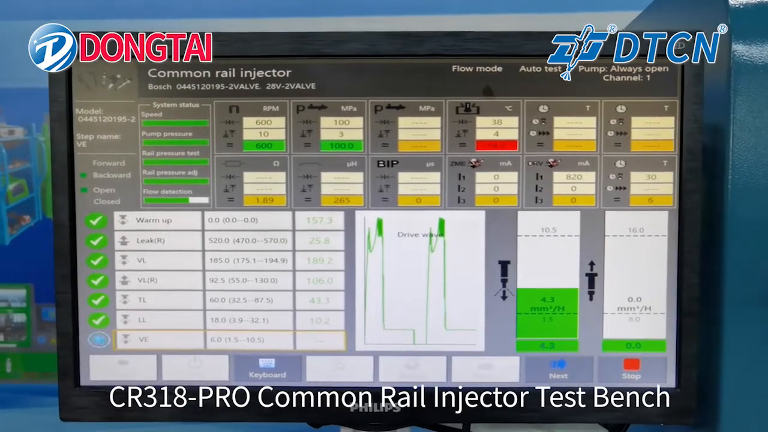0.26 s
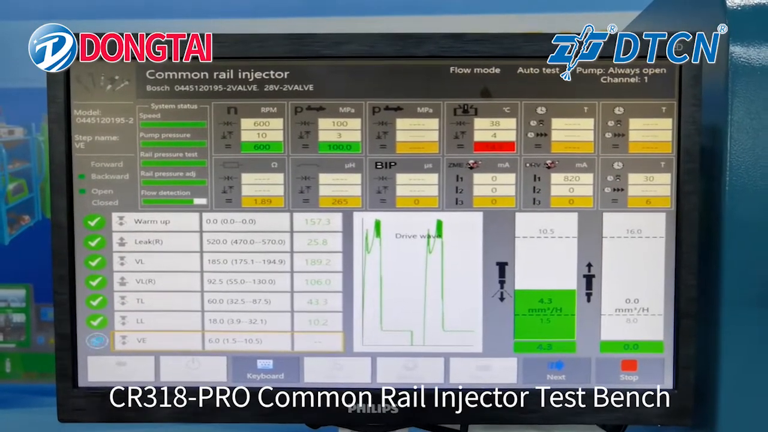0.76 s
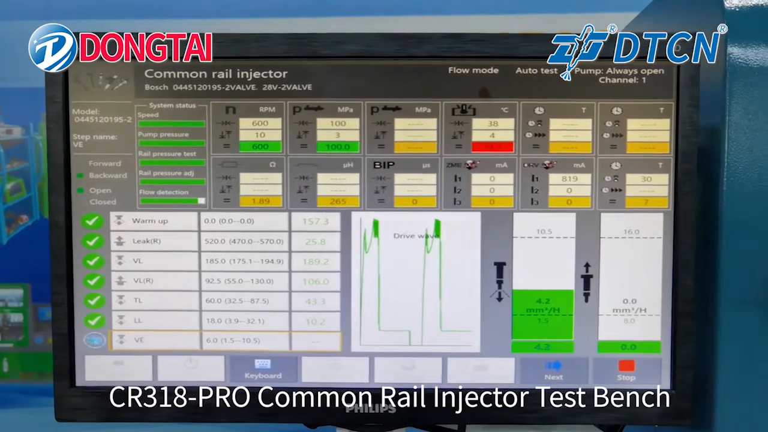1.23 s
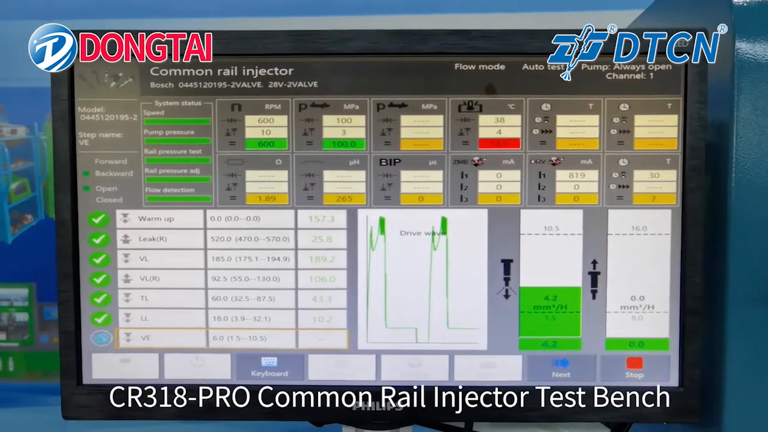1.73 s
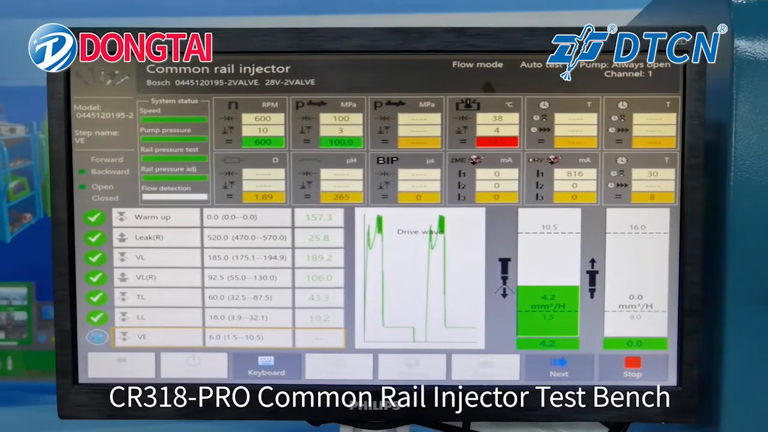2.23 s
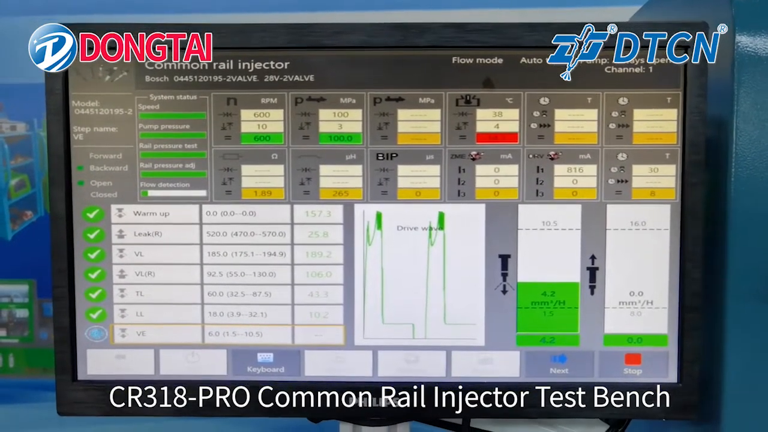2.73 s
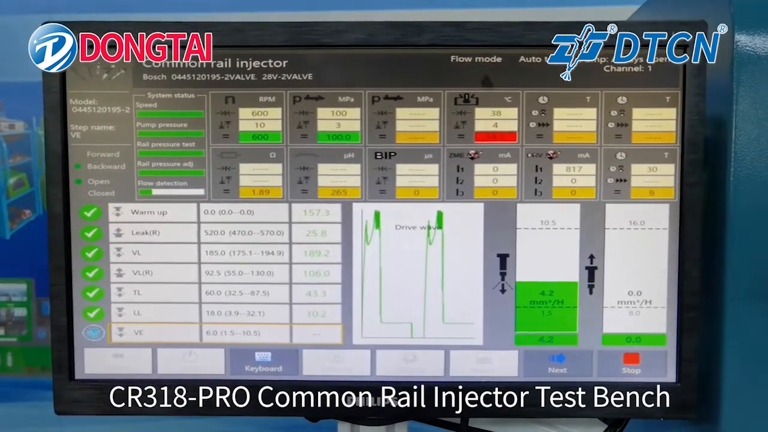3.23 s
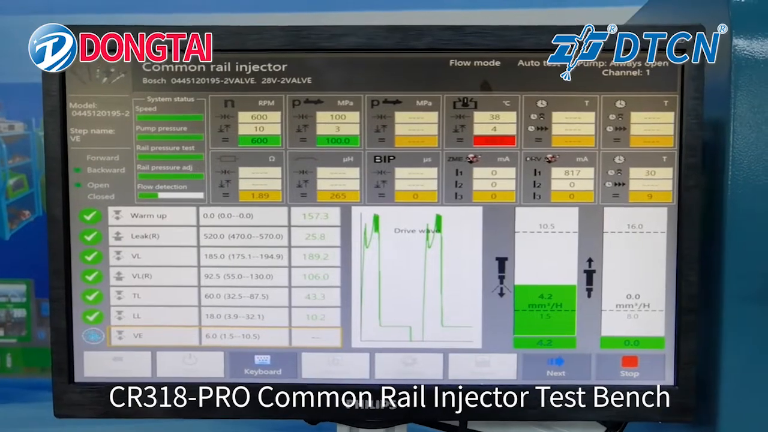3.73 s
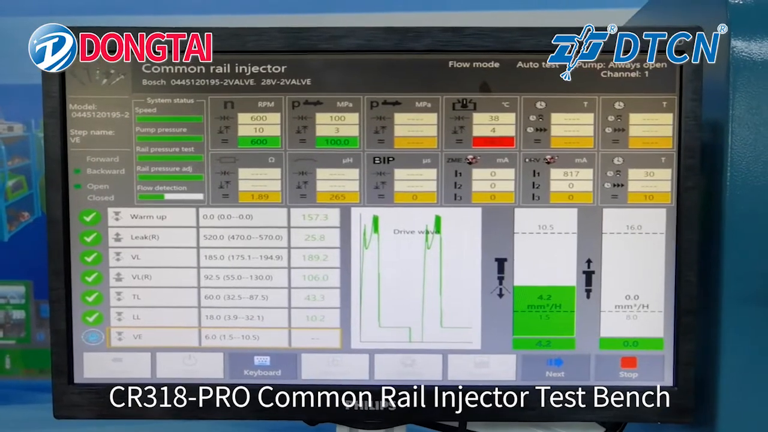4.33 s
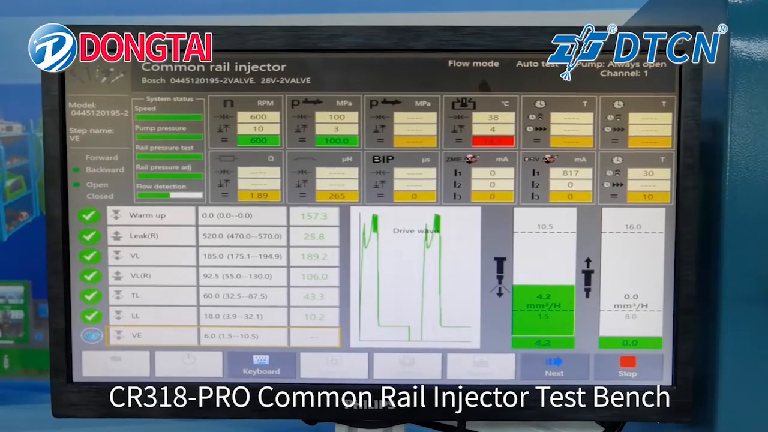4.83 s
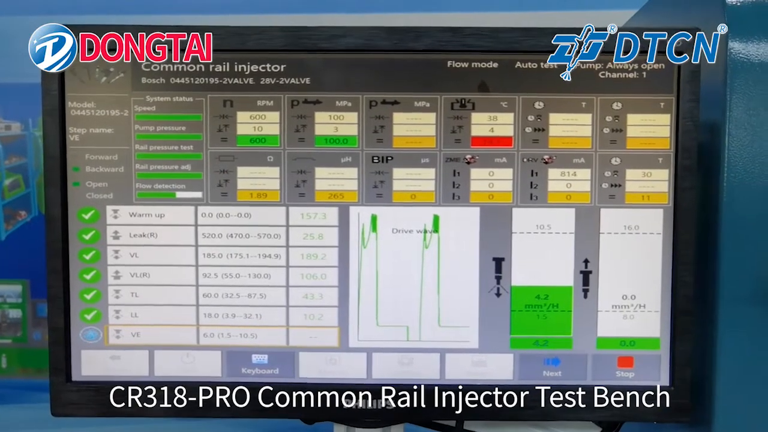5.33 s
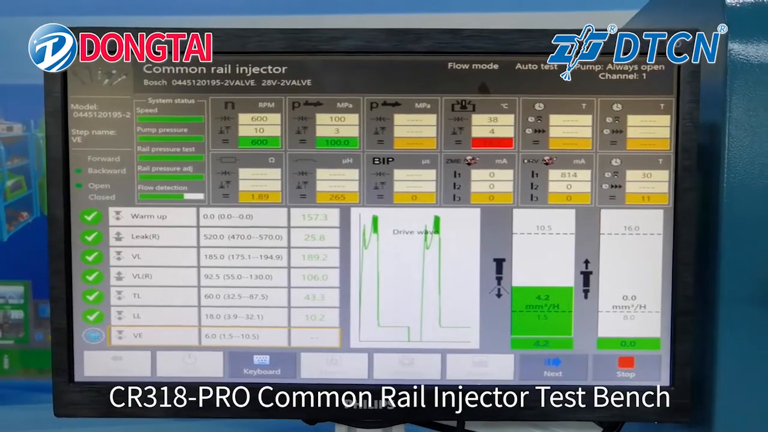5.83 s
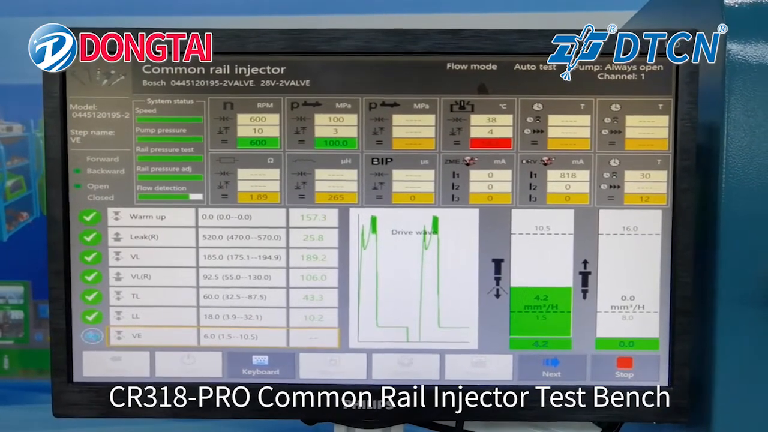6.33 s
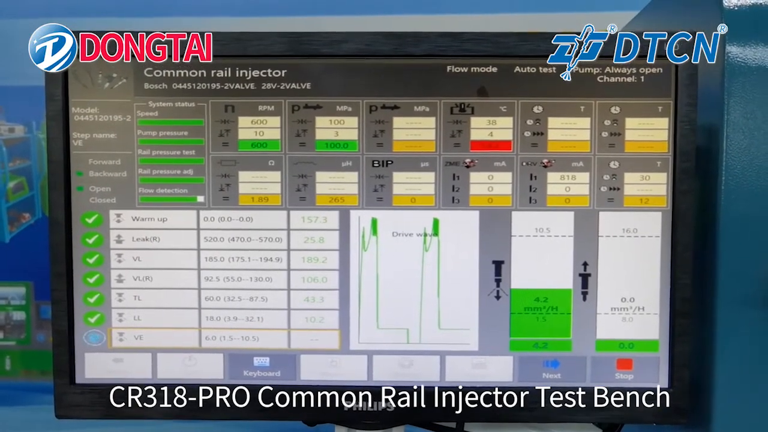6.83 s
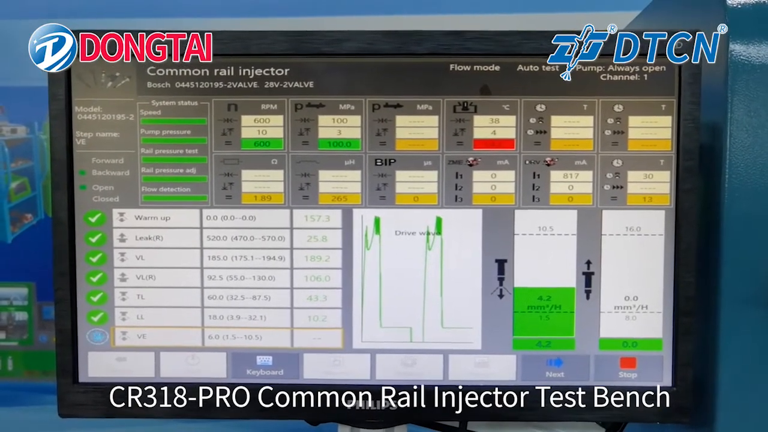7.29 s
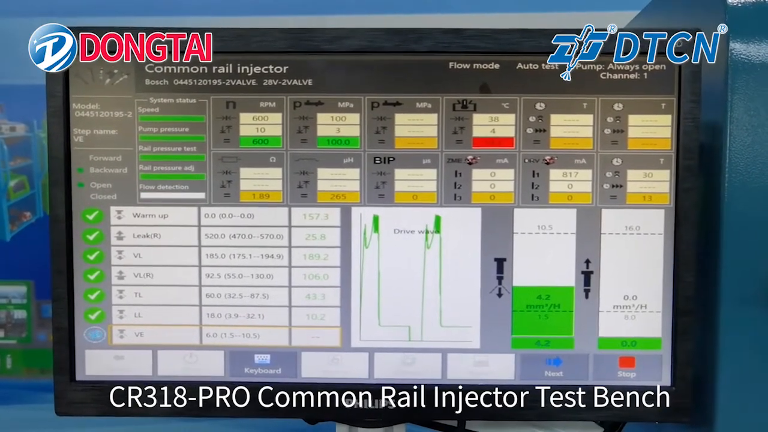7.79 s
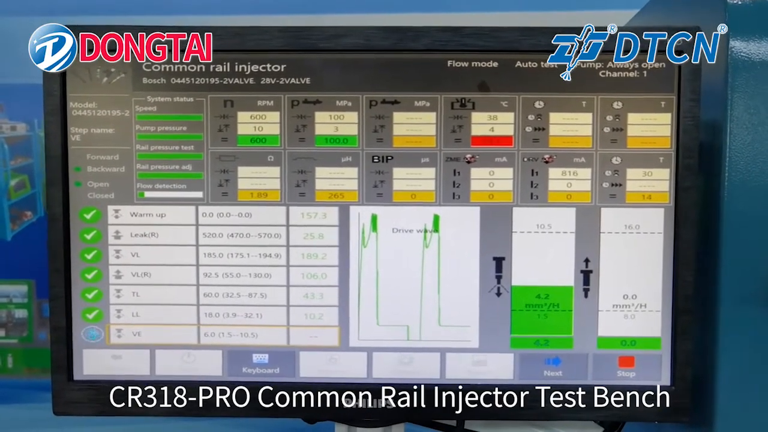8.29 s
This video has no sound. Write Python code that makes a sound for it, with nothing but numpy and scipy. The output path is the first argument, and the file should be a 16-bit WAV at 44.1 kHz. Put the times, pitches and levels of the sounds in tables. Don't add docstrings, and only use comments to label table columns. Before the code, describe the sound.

From 0 to about 8.5 seconds an injector test bench runs without pause in a workshop, already at full speed at the start and cut off still running. Its gear pump makes a coarse buzz near 70 pulses per second, strongest in the bass around 200 hertz, with a thick stack of steady metallic whines reaching far into the treble. Around 8 kilohertz the motor drive sings shrilly, its close side tones beating in a fast flutter, roughly ten to twenty throbs per second. Underneath lie warm fan rumble and electrical hum. Oil and air hiss through the ringing cabinet, pulsing with the pump. The close hand-held stereo microphone gives a wide, bright, harsh picture with centred bass; the treble dips faintly around 2, 3.7 and 5.6 seconds. Pitch never changes.

```python
import sys
import numpy as np
from scipy import signal
from scipy.fft import rfft, irfft, next_fast_len
from scipy.io import wavfile
from scipy.ndimage import uniform_filter1d

SR = 44100
rng = np.random.default_rng(int(sys.argv[2]) if len(sys.argv) > 2 else 0)


def voltage_ratio(level):
    return 10 ** (np.asarray(level, float) / 20)


def wrap_up_sound(samples):
    columns = np.atleast_2d(samples).T
    tamed = np.clip(columns, -1, 1)
    steps = np.round(tamed * 32767).astype(np.int16)
    wavfile.write(sys.argv[1], SR, steps)


N = 377055
M = next_fast_len(N, real=True)
HZ = np.fft.rfftfreq(M, 1 / SR)
TOOTH_HZ = 69.9616
SWITCH_HZ, SLOT_HZ = 7999.92, 9.5775
SLOT_DELAY_S = .0765


def along(points, hz):
    f, value = np.transpose(points)
    return np.interp(np.log(hz + 1), np.log(f + 1), value)


def chance(*shape):
    return (rng.standard_normal(shape) + 1j * rng.standard_normal(shape)) / np.sqrt(2)


def tones(hz, left_db, right_db, lead, start, drift_db, drift_hz, flutter_db, flutter_hz, comb_hz):
    step = np.arange(-300, 301)
    size = round(np.ceil(N * comb_hz / SR) * SR / comb_hz)
    offset_hz = step * SR / size

    def bell(width_hz):
        shape = np.exp(-(offset_hz / width_hz) ** 2)
        return shape / np.linalg.norm(shape)

    skirt = np.outer(voltage_ratio(drift_db), bell(drift_hz)) + np.outer(voltage_ratio(flutter_db), bell(flutter_hz))
    shared = chance(len(hz), len(step))
    own = chance(2, len(hz), len(step))
    line = (step == 0) + skirt * (1.18 * shared + .5 * own)
    line = line / np.sqrt(1 + voltage_ratio(drift_db) ** 2)[:, None]
    phase = start + np.outer([1, 0], lead)
    phasor = voltage_ratio([left_db, right_db]) * np.exp(1j * phase)
    line = line * phasor[..., None] * size / np.sqrt(2)
    spectrum = np.zeros((2, size // 2 + 1), complex)
    bins = np.round(hz * size / SR).astype(int)[:, None] + step
    np.add.at(spectrum, (np.arange(2)[:, None, None], bins[None]), line)
    return irfft(spectrum, size)[:, :N]


def noise(power, alike, lag_s, patchy_db):
    grains = signal.stft(rng.standard_normal((2, M)), nperseg=512)[2]
    field = rng.standard_normal(grains.shape[1:])
    field = uniform_filter1d(field, size=8, axis=0)
    field = uniform_filter1d(field, size=16, axis=1)
    patches = voltage_ratio(patchy_db * field / field.std())
    pair = signal.istft(grains * patches, nperseg=512)[1][:, :M]
    turn = np.arccos(np.clip(alike, -1, 1)) / 2
    mid, side = rfft(pair) * [np.cos(turn), np.sin(turn)]
    late = np.exp(-1j * np.pi * HZ * lag_s)
    ports = np.array([(mid + side) * late, (mid - side) / late])
    return irfft(np.sqrt(power * SR / 2) * ports, M)[:, :N]


# multiple, left level/dB, right level/dB, left lead/rad
STRONG_TONES = [(2, -37.5, -36.4, -0.1), (3, -28.6, -27.7, -0.2), (4, -36.3, -35.3, -0.3),
                (5, -37.3, -36.5, -0.5), (6, -44.6, -45.4, -0.5), (7, -57.9, -66.5, -2.3),
                (8, -49.5, -50.8, 0.1), (13, -59.5, -53.6, -0.3), (15, -51.7, -66.1, 1.3),
                (16, -54.5, -54.0, -1.2), (54, -55.9, -52.1, -1.4), (10, -53.2, -47.9, -0.8),
                (11, -48.0, -45.5, -0.4), (12, -42.4, -39.5, -1.2), (14, -52.1, -50.8, -1.1),
                (18, -44.0, -46.2, -2.0), (20, -43.2, -40.7, -1.5), (21, -46.7, -46.7, 2.9),
                (22, -42.0, -43.3, -3.1), (27, -50.4, -45.7, 2.6), (36, -40.9, -52.2, -1.0),
                (38, -43.2, -40.7, -0.2), (39, -46.8, -44.8, -0.2), (42, -42.0, -51.0, -2.6),
                (44, -36.8, -35.1, -1.4), (46, -39.6, -39.3, -2.3), (49, -36.4, -32.8, -2.2),
                (52, -41.6, -40.5, -0.2), (53, -41.7, -45.5, -1.2), (50, -45.3, -41.1, -1.7)]
# multiple, left level/dB, right level/dB, left lead/rad
MORE_STRONG_TONES = [(56, -40.4, -53.3, -0.8), (59, -43.3, -41.4, -2.3), (106, -43.2, -38.2, -3.0),
                     (74, -39.5, -37.2, 0.1), (75, -42.6, -40.2, 0.8), (80, -43.6, -37.9, -0.3),
                     (81, -46.7, -39.6, -0.3), (82, -32.5, -31.8, 1.9), (92, -39.5, -41.9, 0.5),
                     (93, -40.2, -36.8, -1.1), (94, -35.8, -33.0, -0.8), (104, -42.9, -35.4, -0.7),
                     (105, -44.1, -34.6, -0.7), (109, -39.6, -37.1, 0.8), (112, -47.7, -36.8, 0.1),
                     (116, -38.6, -34.8, 0.5), (118, -32.7, -32.8, -2.7), (120, -37.1, -34.8, 2.6),
                     (148, -45.3, -41.7, -1.6), (119, -35.0, -34.0, 2.5), (121, -34.4, -33.3, 3.1),
                     (122, -38.9, -36.7, 1.5), (125, -34.2, -33.8, 1.9), (128, -44, -43, 0.5),
                     (139, -43.6, -42.0, 2.5), (144, -41.8, -38.5, 1.9), (157, -42.6, -42.7, -1.3),
                     (167, -45.6, -46.1, 0.6), (173, -44.7, -45.1, 1.3), (216, -52.9, -54.0, 0.1)]
# f/Hz, level/dB
OTHER_TONES = [(1600, -64), (2800, -53.5), (3600, -37), (4400, -57.5), (5400, -46.5), (6400, -55.5),
               (7400, -43), (8400, -60.5), (9500, -46), (11000, -51.5), (12300, -52.5), (13000, -71),
               (14200, -61), (15600, -73)]
# f/Hz, half width/Hz, left level/dB, right level/dB, left lead/rad
RINGING_PANELS = [(1720, 110, -62, -61, 3.1), (2835, 70, -52, -53, 3.14), (3380, 330, -44.5, -41.5, -2),
                  (4450, 260, -47, -47, 3.14), (8480, 330, -39.5, -37, 2.9)]
# f/Hz, delay/tooth period
STROKE_DELAY = [(500, .13), (900, 0.131), (1900, .55), (2400, 0), (4100, .08), (6000, 0), (6300, 0.463),
                (6700, 0.461), (7000, -.1), (9000, 0)]
# f/Hz, spread/rad
WALL_BLUR = [(900, 0.2), (1100, 1.74), (2400, 1.3), (3300, 1.65), (4200, 1.02), (5500, 1.01), (6500, 0.33),
             (7400, .8), (10000, 0.91), (14000, 0.32)]


def pump():
    multiple = np.arange(1, 224)
    hz = multiple * TOOTH_HZ
    scatter = rng.standard_normal((3, len(hz)))
    level = along([(70, -85), (500, -63), (1100, -53.5)] + list(OTHER_TONES), hz)
    level = level + 3.23 * np.clip(scatter[0], -3, 1.3)
    port_lag_s = .000348
    lead = -2 * np.pi * hz * port_lag_s + 1.27 * scatter[2]
    # left dB, right dB, left lead rad
    rows = np.array([level + 3.1 * scatter[1], level - 2.0 * scatter[1], lead])
    for centre_hz, half_width_hz, *heard in RINGING_PANELS:
        inside = np.exp(-((hz - centre_hz) / half_width_hz) ** 8)
        spread = np.c_[[2.5, 2.5, .3]]
        ring = np.c_[heard] + spread * scatter[[0, 0, 2]]
        rows = rows + inside * (ring - rows)
    strong = np.transpose(STRONG_TONES + MORE_STRONG_TONES)
    rows[:, strong[0].astype(int) - 1] = strong[1:]
    thud = 1.93 - .85 * (multiple - 2.62) ** 2 + np.pi * (multiple < 3)
    blur = along(WALL_BLUR, hz) * rng.standard_normal(len(hz))
    stroke = blur - 2 * np.pi * np.cumsum(along(STROKE_DELAY, hz))
    start = np.where(multiple < 7, thud, stroke)
    drift_db = along([(200, -32), (2000, -19.5), (9000, -16.0)], hz)
    flutter_db = along([(200, -20.5), (2000, -25), (9000, -18)], hz)
    return tones(hz, *rows, start, drift_db, drift_hz=0.76, flutter_db=flutter_db, flutter_hz=10.0,
                 comb_hz=TOOTH_HZ)


# offset/slot rate, left level/dB, right level/dB, left lead/rad
SIDE_TONES = [(-18, -38.0, -35.1, 2.6), (-16, -42.2, -45.7, 1.7), (-15, -43.6, -43.9, 0.6),
              (-12, -36.6, -46.6, -0.5), (-11, -46.1, -40.0, -1.1), (-9, -43.2, -43.2, -2.0),
              (-5, -38.5, -42.2, 0.0), (-3, -34.3, -29.9, -0.7), (-1, -38.5, -37.8, 1.9),
              (1, -38.5, -34.9, -1.1), (3, -30.7, -29.8, -1.6), (5, -38.4, -35.0, -2.2),
              (6, -41.8, -43.3, -1.4), (7, -41.1, -52.8, -1.5), (9, -45.7, -40.8, -1.1),
              (15, -43.3, -54.0, 1.2), (18, -36.8, -48.8, -0.3), (24, -44.3, -42.4, -2.4),
              (27, -44.0, -46.6, -1.1), (36, -42.6, -48.6, -1.8)]


def drive():
    near = 18
    steps = np.arange(-2 * near, 2 * near + 1)
    scatter = rng.standard_normal((3, len(steps)))
    faint_db = -14 * (abs(steps) > near) + 3 * scatter[:2]
    rows = np.array([-54 + faint_db[0], -46 + faint_db[1], np.pi * scatter[2]])
    strong = np.transpose(SIDE_TONES)
    rows[:, strong[0].astype(int) + 2 * near] = strong[1:]
    steady = np.ones(len(steps))
    start = .8 * rng.standard_normal(len(steps)) - 2 * np.pi * steps * SLOT_HZ * SLOT_DELAY_S
    start = start + .03 * steps ** 2
    song = tones(SWITCH_HZ + steps * SLOT_HZ, *rows, start, -11 * steady, drift_hz=0.84,
                 flutter_db=-19 * steady, flutter_hz=6.5, comb_hz=SLOT_HZ)
    return voltage_ratio(-0.6) * song


# f/Hz, left level/dB, right level/dB, left lead/rad
HUM_TONES = [(86.8, -54.5, -50.9, -0.0), (105.27, -39.0, -37.6, -0.1), (115.1, -55.0, -52.7, -0.1),
             (136.6, -46.4, -46.1, -0.2), (160.2, -50.5, -49.9, -0.0), (162.8, -39.0, -39.8, 0.0),
             (177, -46.6, -45.6, -0.1), (182.4, -49.2, -47.6, -0.3), (220, -46.2, -44.1, -0.4),
             (249.7, -53.6, -54.2, -0.3), (400.4, -61.1, -57.3, -0.2), (445.5, -54.9, -56.2, -0.3),
             (999.95, -49.3, -49.7, -1.3), (1730.1, -61.7, -62.6, -3.0), (1999.9, -61.0, -62.7, 0.3),
             (7050.8, -57.9, -54.6, -2.2)]


def hum():
    hz, *rows = np.transpose(HUM_TONES)
    drift_db = along([(100, -15), (165, -9.5), (250, -17), (900, -11)], hz)
    start = rng.uniform(0, 2 * np.pi, len(hz))
    return tones(hz, *rows, start, drift_db, drift_hz=2.4, flutter_db=drift_db - 7, flutter_hz=11,
                 comb_hz=SR / M)


# f/Hz, level per Hz/dB
FAN_AIR = [(15, -88), (65, -79), (88, -64.5), (135, -60.5), (190, -58), (250, -63.5), (430, -68),
           (500, -76), (620, -79.5), (900, -94), (1500, -120)]
# f/Hz, correlation -1 to 1
LIKENESS = [(30, .7), (100, 1), (250, 1), (500, 0.52), (1000, 0.14), (1500, -0.11), (2300, -0.16),
            (2650, 0.51), (3000, 0.34), (3600, -0.26), (6000, -0.16), (8400, -0.4), (9500, 0.059),
            (14000, -0.3), (15300, 0.82)]


def rumble():
    power = voltage_ratio(along(FAN_AIR, HZ)) ** 2
    return noise(power, along(LIKENESS, HZ), lag_s=1.5e-4, patchy_db=.8)


# f/Hz, level per Hz/dB
FLOW = [(300, -110), (600, -83.5), (800, -74.5), (1100, -77), (2300, -75.5), (2800, -69.5), (4400, -69.5),
        (6000, -72.5), (6800, -64.5), (7600, -62), (10500, -74), (12700, -75.5), (15300, -78), (15800, -80)]
# f/Hz, width/Hz, left level per Hz/dB, right level per Hz/dB
EXCITED_PANELS = [(1244, 48, -69, -73), (1420, 22, -74, -87), (5810, 160, -59.5, -64.5),
                  (6100, 90, -77, -54), (6720, 180, -63, -63.5), (7270, 250, -79, -60.5),
                  (7500, 200, -63, -60), (8200, 140, -74, -67), (8400, 27, -65, -56), (8660, 55, -50, -46),
                  (8460, 56, -51, -48.5), (8500, 44, -88, -79), (10070, 77, -65, -60),
                  (11860, 220, -69, -64.5), (14300, 840, -77, -76), (13650, 500, -70, -74),
                  (9600, 900, -65, -66)]
# f/Hz, width/Hz, depth 0-1
OPPOSITION = [(1716, 53, 1), (2430, 140, 0), (2795, 96, 0.98), (4350, 50, 0.96), (4220, 69, .99),
              (4370, 24, 0.4), (5000, 91, 1), (6660, 50, .5), (10300, 80, .6), (12800, 100, .65),
              (13100, 70, .6)]


def rush():
    power = voltage_ratio(along(FLOW, HZ)) ** 2 * np.ones((2, 1))
    for hz, width_hz, left_db, right_db in EXCITED_PANELS:
        resonance = 1 / (1 + (2 * (HZ - hz) / width_hz) ** 2) ** 2
        power = power + voltage_ratio([[left_db], [right_db]]) ** 2 * resonance
    alike = along(LIKENESS, HZ)
    for hz, width_hz, depth in OPPOSITION:
        dip = np.clip(depth, 0, 1) * np.exp(-((HZ - hz) / width_hz) ** 2)
        alike = alike - (1 + alike) * dip
    t = np.arange(N) / SR
    spurt = 1 + .5 * np.exp(-3 * (t * TOOTH_HZ % 1))
    throb = voltage_ratio(0.91 * np.cos(4 * np.pi * SLOT_HZ * (t - SLOT_DELAY_S)))
    swell = spurt * throb
    return noise(power, alike, lag_s=0, patchy_db=2.5) * swell / np.sqrt(np.mean(swell ** 2))


def scene():
    return pump() + drive() + hum() + rumble() + rush()


# t/s, level/dB
HAND_SWAY = [(0.0, -21.5), (1.79, -21.5), (2.07, -22.5), (2.38, -21), (3.67, -22.5), (5.05, -21.5),
             (5.64, -22.5), (5.67, -21), (7.24, -21), (7.28, -21.5), (8.55, -21.5)]


def microphone(dry):
    t, db = np.transpose(HAND_SWAY)
    gain = voltage_ratio(np.interp(np.arange(N) / SR, t, db - np.mean(db)))
    spectrum = rfft(dry, M) * (HZ < 15740)
    share = 1 / (1 + (4500 / (HZ + 1)) ** 8)
    bass = irfft(spectrum * (1 - share), M)[:, :N]
    treble = irfft(spectrum * share, M)[:, :N]
    return bass + gain * treble


def roll_off(x):
    return signal.sosfilt(signal.butter(12, 16060, fs=SR, output="sos"), x)


def record(dry):
    mix = microphone(dry)
    return roll_off(mix)


dry = scene()
out = record(dry)
wrap_up_sound(out)
```